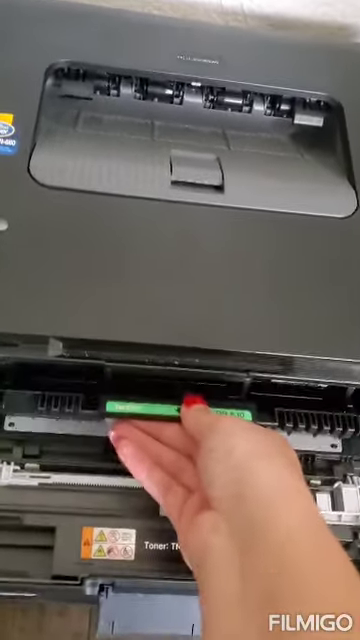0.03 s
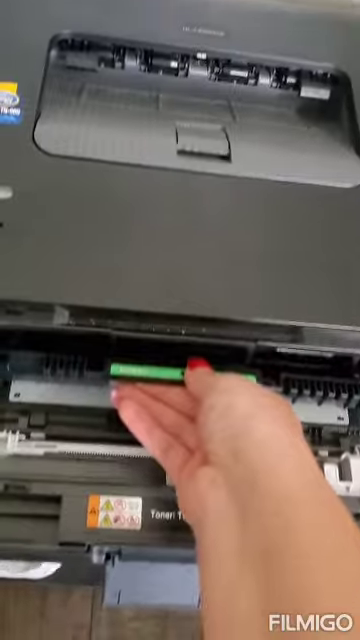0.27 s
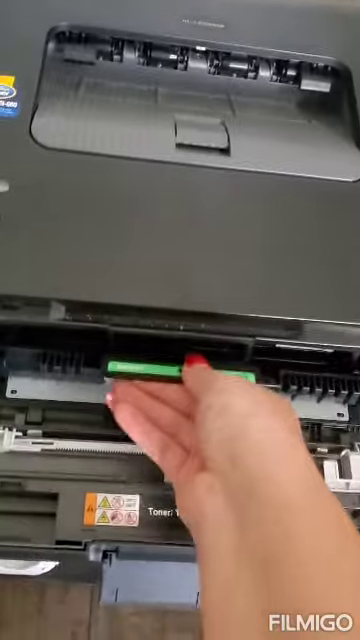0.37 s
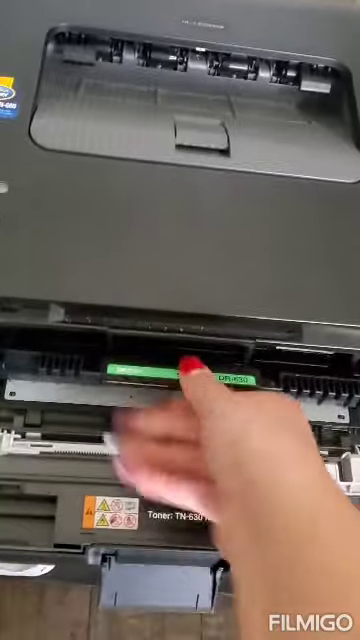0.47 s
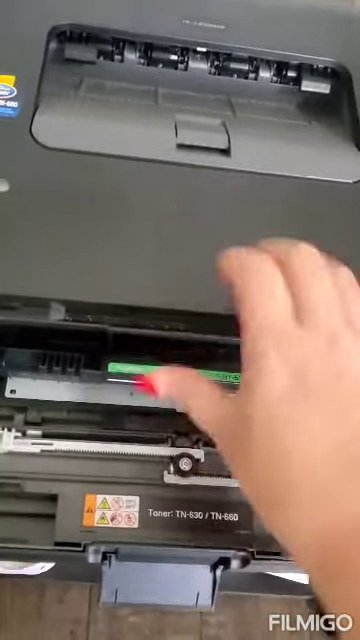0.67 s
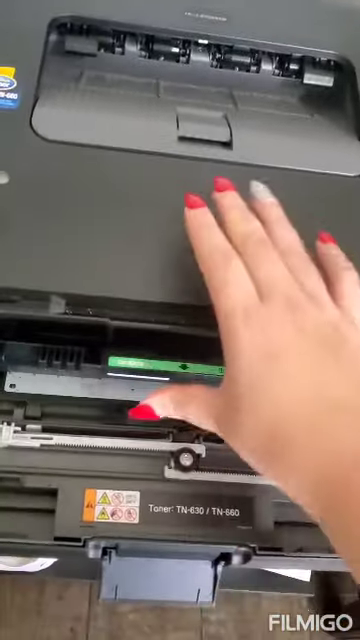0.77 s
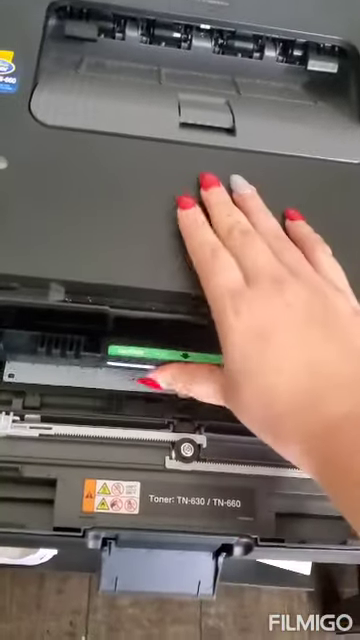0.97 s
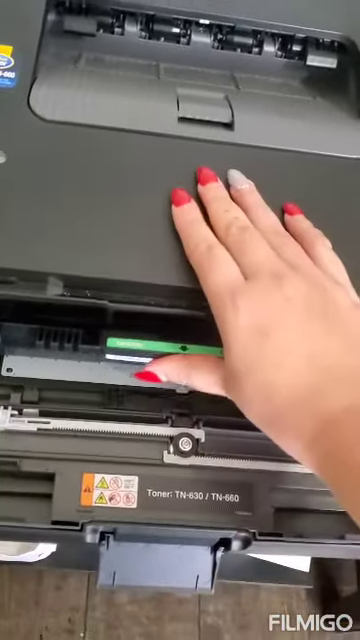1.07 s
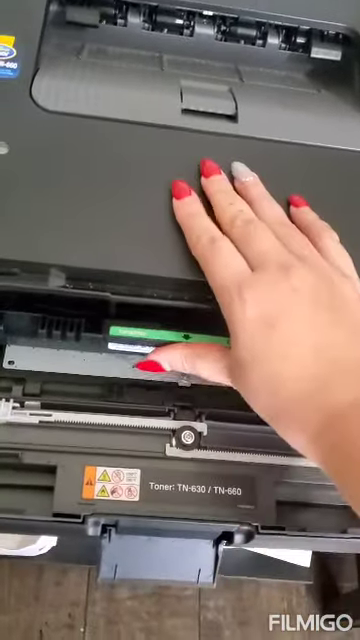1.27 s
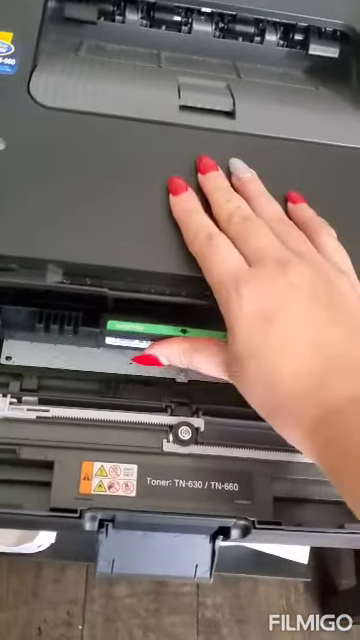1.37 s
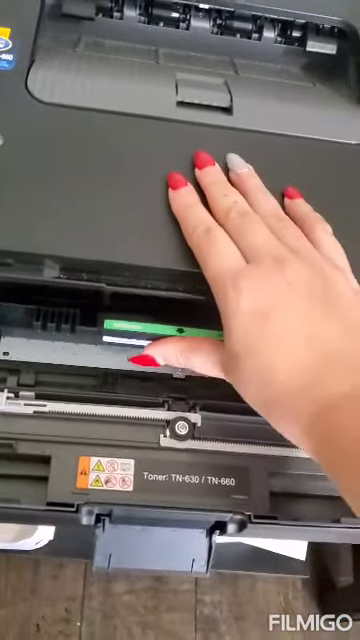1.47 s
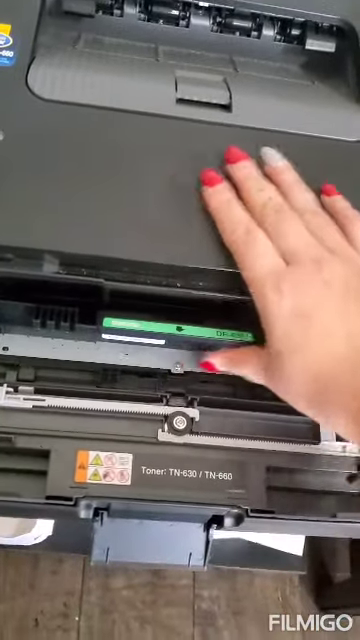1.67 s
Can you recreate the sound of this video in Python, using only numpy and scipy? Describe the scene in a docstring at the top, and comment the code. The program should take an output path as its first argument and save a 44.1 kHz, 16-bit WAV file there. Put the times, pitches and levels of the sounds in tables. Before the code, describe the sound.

Close up in a small, faintly humming room, a plastic cartridge scrapes into a printer and lands with a low clunk. After a brief lull come sharp clicks and snaps, with soft hand rubbing and a low rumble.

```python
"""A toner cartridge scrapes along its guides into an office printer and seats with a deep clunk.
The clunk is the printer's frame, shaken by a few heavy pushes. A hand rubs and presses on the
plastic parts, which click, snap and ring in the hollow housing, while the frame rumbles.
A small room answers each click, over a steady hiss and hum. The microphone is close."""
import sys
import numpy as np
from scipy import signal
from scipy.io import wavfile

SR = 44100
rng = np.random.default_rng(int(sys.argv[2]) if len(sys.argv) > 2 else 0)


def dump(signal):
    """Clip the signal to [-1, 1] and save it as 16-bit WAV at the path in sys.argv[1]."""
    limited = np.clip(np.atleast_2d(signal).T, -1, 1)
    pcm = np.round(limited * 32767).astype(np.int16)
    wavfile.write(sys.argv[1], SR, pcm)


N = 74970
T = np.arange(N) / SR


def from_db(db):
    """Turn decibels into a gain."""
    return 10 ** (np.asarray(db) / 20)


def rms_one(x):
    """Scale a sound to an average (rms) level of 1."""
    return x / np.sqrt(np.mean(x ** 2) + 1e-20)


def at_hz(points, hz):
    """Read between a table's rows, with octaves evenly spaced."""
    freqs, values = np.transpose(points)
    return np.interp(np.log(hz), np.log(freqs), values)


def pan(db):
    """Left and right gains that make the left louder by db."""
    return from_db(db * np.array([[.5], [-.5]]))


def drift(rate):
    """A smooth random wobble of size about 1; a higher rate [Hz] is quicker."""
    r = np.exp(-80 * np.pi * rate / SR)
    slow = signal.lfilter([1], [1, -2 * r, r * r], rng.standard_normal(N // 40 + 2002))[2000:]
    return np.interp(np.arange(N) / 40, np.arange(len(slow)), rms_one(slow))


def impulses(times, sizes):
    """One spike at each time."""
    return np.bincount(np.clip(times * SR, 0, N - 1).astype(int), sizes, N)


def ring(force, hz, t60):
    """Each spike starts a tone that dies away by 60 dB in t60 seconds."""
    r, w = from_db(-60 / (t60 * SR)), 2 * np.pi * hz / SR
    return signal.lfilter([0, np.sin(w)], [1, -2 * r * np.cos(w), r * r], force + 1e-18)


def resonate(x, hz, width):
    """Let through the sound near one pitch."""
    r, w = np.exp(-np.pi * width / SR), 2 * np.pi * hz / SR
    return signal.lfilter(np.array([1, 0, -1]) * (1 - r * r) / 2, [1, -2 * r * np.cos(w), r * r], x)


def rise_and_fade(power, rise_s, t60):
    """Each spike of power builds up, then falls by 60 dB in t60 seconds."""
    fading = signal.lfilter([1], [1, -from_db(-120 / (t60 * SR))], power + 1e-18)
    r = np.exp(-1 / (rise_s * SR))
    return signal.lfilter([1 - r], [1, -r], fading)


# How the microphone leans to one side: (frequency [Hz], left minus right [dB])
MIC_BALANCE = [(300, 1), (1300, 1.5), (2500, 4), (4200, 1.5), (5600, 9.5), (7000, 0), (8500, 1),
               (10500, -7), (14000, -2)]
def noise_bands(likeness):
    """Stereo noise in slices from low to high: each slice's pitch, filter and noise."""
    edges_hz = np.r_[22 * 2 ** (np.arange(24) / 3), np.arange(5300, 16600, 1120)]
    white = rng.standard_normal((2, 2, N))
    for k, (low, high) in enumerate(zip(edges_hz, edges_hz[1:])):
        hz = np.sqrt(low * high)
        band_filter = signal.butter(2, [low, high], "band", fs=SR, output="sos")
        mid, side = signal.sosfilt(band_filter, white[k % 2])
        alike = np.clip(at_hz(likeness, hz), -1, 1)
        noise = np.sqrt((1 + alike) / 2) * mid + np.sqrt((1 - alike) / 2) * side * [[1], [-1]]
        yield hz, band_filter, noise * pan(at_hz(MIC_BALANCE, hz))


# How alike left and right are in the hiss: (frequency [Hz], likeness [-1 to 1])
HISS_LIKENESS = [(60, 0.82), (200, 1), (350, -0.42), (650, -0.14), (1300, -0.66), (3000, -0.096),
                 (7000, 0.69), (13000, 1)]
def hiss_bands():
    """Slices of noise that the room's hiss and the rubbing hand share."""
    return [(hz, noise) for hz, _, noise in noise_bands(HISS_LIKENESS)]


# The tone of the room's hiss: (frequency [Hz], relative level [dB])
AIR_TONE = [(25, -14), (45, -11.5), (72, -3.5), (100, -5), (135, -10), (175, -13), (220, -13), (300, -8),
            (400, -14), (650, -19), (1000, -21.5), (1300, -21), (1800, -25), (2500, -29.5), (4000, -42.5),
            (5700, -53.5), (7500, -46), (9200, -59), (10500, -46.5), (12000, -45), (16000, -51)]
# Which side it comes from: (frequency [Hz], left minus right [dB])
AIR_BALANCE = [(100, 1), (400, -2.5), (1200, 2), (2500, 2), (4000, 3), (5500, 7), (7000, 10), (8500, -3),
               (10500, 12), (13000, 5)]
def room_air(hiss, level_db=-54.5):
    """Steady room noise, mostly from the left."""
    air = sum(noise * from_db(at_hz(AIR_TONE, hz)) * pan(at_hz(AIR_BALANCE, hz)) for hz, noise in hiss)
    return from_db(level_db) * rms_one(air)


# The tones of the hum: (pitch [Hz], level [dB])
HUM_TONES = [(69, -60.5), (304.5, -51), (1217, -68), (1389, -72)]
def hum(waver_hz=1.24, waver_db=0.95):
    """A few steady tones waver slightly in pitch and loudness."""
    out = 0
    for hz, db in HUM_TONES:
        phase = 2 * np.pi * np.cumsum(hz + waver_hz * drift(rate=5.9)) / SR
        out += np.sqrt(2) * from_db(db + waver_db * drift(rate=1.67)) * np.sin(phase)
    return out * pan(db=1.5)


# How loudly the hand rubs: (time [s], level [dB])
RUB_LEVELS = [(0, -66), (.045, -53.5), (.15, -63), (.22, -58.5), (.42, -56), (.5, -55), (.58, -65),
              (.78, -70.5), (.85, -63), (.95, -61), (1.1, -63.5), (1.19, -66.5), (1.3, -62.5), (1.5, -57),
              (1.62, -57.5), (1.7, -55)]
# The tone of the rubbing: (frequency [Hz], relative level [dB])
RUB_TONE = [(150, 1), (800, 7.5), (2000, 4), (4000, -7), (5700, 0.5), (8500, -24.5), (15000, -14.5)]
def hand_rub(hiss):
    """Skin sliding on plastic makes a grainy hiss."""
    rub = sum(noise * from_db(at_hz(RUB_TONE, hz)) for hz, noise in hiss)
    level_db = np.interp(T, *np.transpose(RUB_LEVELS)) + 0.5 * drift(rate=34)
    return from_db(level_db) * rms_one(rub)


# How loudly the frame rumbles: (time [s], level [dB])
RUMBLE_LEVELS = [(0, -74), (.11, -45), (.17, -56), (.225, -39), (.33, -53), (.39, -34.5), (.44, -44.5),
                 (.5, -58.5), (.65, -85), (.78, -53.5), (1.4, -54.5), (1.58, -58), (1.65, -50), (1.7, -41)]
def frame_rumble(pitch_hz=68.34, wander_hz=8.3):
    """The frame sways at a low, unsteady pitch as the hand leans on it."""
    phase = 2 * np.pi * np.cumsum(pitch_hz + wander_hz * drift(rate=23.2)) / SR
    level_db = np.interp(T, *np.transpose(RUMBLE_LEVELS))
    return np.sqrt(2) * from_db(level_db) * np.sin(phase)


# Brief swells of noise: (time [s], level [dB], about half the length [s], pitch [Hz])
NOISE_SWELLS = [(0.054, -59, .012, 5150), (0.057, -46, 0.0029, 3550), (0.19, -49, .01, 784),
                (0.229, -50, 0.016, 696), (0.241, -44, 0.0054, 1200), (0.253, -42, .007, 780),
                (0.432, -61.5, 0.0064, 11100), (0.5, -57, 0.011, 2696), (.471, -48, .0025, 5800),
                (0.899, -53.5, 0.0051, 1220), (0.957, -52, 0.0091, 856), (1.231, -41.5, 0.0051, 4740),
                (1.238, -38.5, 0.0037, 13300), (1.263, -58, 0.029, 13800), (1.68, -62, 0.029, 11080)]
def scrapes_and_sizzle():
    """Noise swells around one pitch: short scrapes, and the bright sizzle and tail of a sharp snap."""
    out = np.zeros((2, N))
    for time, db, half_length, hz in NOISE_SWELLS:
        width_hz = 0.26 * hz
        noise = rng.standard_normal((2, N))
        pitched = resonate(resonate(noise, hz, width_hz), hz, width_hz)
        swell = np.exp(-.5 * ((T - time) / half_length) ** 2)
        out += from_db(db) * swell * rms_one(pitched)
    return out


# The tone of the hollow plastic, and of the room's echo of it: (frequency [Hz], boost [dB])
PLASTIC_TONE = [(150, -5.5), (280, 1.5), (500, -1.5), (750, 0), (1300, 2), (2000, 1), (3000, 0.5),
                (4300, -4), (6000, -7.5), (9000, -14), (12000, -18.5), (16000, -24)]
ECHO_TONE = [(150, -5), (500, -8.5), (1500, -11), (3000, -13.5), (6000, -15.5), (14000, -10)]
# How long each lasts: (frequency [Hz], time to fade by 60 dB [s])
PLASTIC_FADE = [(200, 0.07), (1000, 0.067), (3000, 0.05), (14000, 0.045)]
ECHO_FADE = [(150, .45), (1000, 0.29), (3000, 0.3), (7000, 0.3), (14000, 0.18)]
# How alike left and right are in a click: (frequency [Hz], likeness [-1 to 1])
RATTLE_LIKENESS = [(150, 0.99), (300, 0.99), (600, -0.43), (1300, -0.44), (3000, -0.19), (7000, .15),
                   (13000, 0.59)]
# Plastic parts knocking together:
# (time [s], strength [dB], bass boost [dB], treble boost [dB], ring pitch [Hz], ring boost [dB])
CONTACTS = [(.058, -46, 7, 4, 3270, -3), (0.065, -31.5, 4, -1, 3380, -5), (.069, -36, 4.5, -1, 1150, 7),
            (0.074, -36, 13, -8, 1222, 3), (.082, -36.5, 3.5, -2, 1500, 0), (0.09, -32, 6, -3, 1937, -2),
            (0.098, -38, 0, -17, 2870, -4), (0.101, -47.5, 4, -8, 1640, 9.5),
            (.245, -35.5, 5.5, 11, 748, -2.5), (.248, -40, 16, -10, 1920, 7.5),
            (0.259, -35, 4, 4, 1520, -33), (.265, -33.5, -23, 0.5, 4000, -5.5),
            (0.274, -43, 13.5, 9, 1140, -15), (0.281, -38.5, -2, 4, 1950, -16),
            (.306, -41, 12.5, 0, 1590, -3), (0.437, -42.5, -6, 4.5, 1360, 1), (.471, -38, -1, 6, 2472, 0.5),
            (.475, -54, -1, -4, 3070, 9), (0.9718, -37, 2, 6.5, 1062, 2.5), (0.975, -45, -23, 7, 3240, 4),
            (1.069, -52, -5, -3, 2660, -11), (1.2268, -33.5, 1, 5, 3070, -6),
            (1.236, -27.5, -8.5, 5, 3270, -10), (1.242, -35.5, 3.5, -1, 1326, -10),
            (1.328, -42, -12, -12, 5460, -7), (1.333, -47.5, 13, 1, 1350, 2),
            (1.416, -29.5, -1, -3.5, 1996, -1), (1.419, -34.5, 2, -19, 1482, 9.5),
            (1.445, -40.5, 10, -28, 490, 3), (1.459, -44, 10, -26, 986, 7),
            (1.468, -51.5, 16, -14, 574, -8), (1.526, -45, 6, 0, 1193, 3), (1.544, -36, 3, 1, 2094, 0),
            (1.549, -39, -4, -38, 1294, 7), (1.604, -46, 1, 0, 5700, -8), (1.609, -43.5, -3, 0, 1300, -2),
            (1.692, -32, -38, -2.5, 2620, -1.5), (1.697, -38, -36, 4, 3150, -4)]
def clicks(bass_hz=616, middle_hz=2930, treble_hz=11800):
    """Each contact gives a sharp crack, a fast rattle spreading through the plastic and a room echo."""
    times, db, bass_db, treble_db, _, _ = np.transpose(CONTACTS)
    out = np.zeros((2, N))
    for k, (hz, band_filter, noise) in enumerate(noise_bands(RATTLE_LIKENESS)):
        if hz < 130:   # clicks have no deep bass
            continue
        bass = at_hz([(bass_hz, 1), (middle_hz, 0)], hz)
        treble = at_hz([(middle_hz, 0), (treble_hz, 1)], hz)
        band_db = db + bass * bass_db + treble * treble_db + at_hz(PLASTIC_TONE, hz)
        sizes = from_db(band_db) * np.sqrt(SR / 2 / middle_hz)
        power = impulses(times, sizes ** 2)
        rattle = rise_and_fade(power, rise_s=0.00044, t60=at_hz(PLASTIC_FADE, hz))
        echo = rise_and_fade(power, rise_s=0.004, t60=at_hz(ECHO_FADE, hz))
        out += noise * np.sqrt(rattle * from_db(-1) ** 2 + echo * from_db(at_hz(ECHO_TONE, hz)) ** 2)
        crack = signal.sosfilt(band_filter, impulses(times, sizes) + 1e-18)
        crack *= np.sqrt(SR / 1000) * (-1) ** k   # every other slice is flipped
        out += from_db(-14.5) * crack * pan(at_hz(MIC_BALANCE, hz))
    return out


def ringing_parts():
    """Each knocked part rings briefly at its own pitch, reaching the right side a little late."""
    out = np.zeros((2, N))
    lag_cycles = rng.uniform(0.18, 0.25, len(CONTACTS))
    for (time, db, _, _, hz, ring_db), cycles in zip(CONTACTS, lag_cycles):
        for channel, lag in enumerate((0, cycles / hz)):
            knock = impulses(np.array([time + lag]), [from_db(db + ring_db)])
            out[channel] += ring(knock, hz, t60=0.049)
    return out


# Where the open housing rings: (pitch [Hz], width [Hz], left gain [dB], right gain [dB])
HOUSING_TONES = [(762, 42, -1, -20), (1244, 13, -26, -4), (1229, 73, -10, -0.5), (1540, 17, -21, -9),
                 (1720, 24, -35.5, 6), (2050, 30, -23, 5), (2420, 120, -3, -1), (2946, 48, 7, -4),
                 (3330, 94, -15.5, -1), (3670, 98, -21, 5), (5540, 430, -7, -25), (6130, 100, -21, -36),
                 (10900, 400, -38, -13.5), (15500, 550, -2, -18)]
def housing(x):
    """The hollow housing colours every click with the same set of pitches."""
    return x + sum(from_db([[left], [right]]) * resonate(x, hz, width)
                   for hz, width, left, right in HOUSING_TONES)


# Bounces off the printer and a nearby wall: (left delay [s], right delay [s], gain [dB])
BOUNCES = [(.0019, 0.0035, -10.5), (.0053, 0.0049, -12.5), (0.025, .028, -14.5)]
def bounces(x):
    """Near surfaces send back quieter copies, with their own delay on each side."""
    return x + sum(from_db(db) * np.array([np.interp(T - left, T, x[0]), np.interp(T - right, T, x[1])])
                   for left, right, db in BOUNCES)


# Pushes on the frame: (time [s], strength [dB], length [s], direction [+1 or -1])
FRAME_PUSHES = [(0.2417, -21, 0.0014, -1), (0.2451, -19, 0.0018, 1), (.2555, -11.5, 0.0048, -1),
                (0.2593, -22, 0.0031, 1), (0.286, -36, 0.0034, -1), (0.084, -40, 0.00078, 1),
                (1.236, -47.5, 0.0011, 1), (1.445, -37.5, .002, -1), (1.464, -42, 0.0025, 1)]
# The frame's own low notes: (pitch [Hz], gain [dB], time to fade by 60 dB [s])
FRAME_TONES = [(42.5, -9, 0.28), (58.3, -4.5, 0.12), (67.1, -7.5, 0.17), (97.5, -7, 0.19),
               (131.3, -7, 0.17), (151.4, -9, 0.12), (266, 0, 0.092), (315.8, -1.5, 0.26),
               (410.6, -11.5, 0.14)]
def clunk(low_cut_hz=46, left_delay_s=0.00046):
    """Soft, heavy pushes set the frame ringing; the thud reaches the left side a little late."""
    force = np.zeros(N)
    for time, db, length, direction in FRAME_PUSHES:
        pulse = np.sin(np.pi * np.clip((T - time) / length + .5, 0, 1))
        force += direction * from_db(db) * pulse / pulse.sum()
    force = signal.sosfilt(signal.butter(2, low_cut_hz, "high", fs=SR, output="sos"), force)
    thud = sum(from_db(db) * ring(force, hz, t60) for hz, db, t60 in FRAME_TONES)
    return np.array([np.interp(T - left_delay_s, T, thud), thud])


def scene():
    """Cartridge, printer, hand and room together."""
    plastic = from_db(-2) * bounces(housing(clicks())) + ringing_parts() + scrapes_and_sizzle()
    frame = frame_rumble() + clunk()
    hiss = hiss_bands()
    return plastic + frame + hand_rub(hiss) + room_air(hiss) + hum()


def record(dry):
    """The very highest treble is cut off steeply."""
    cutoff_hz = 15900
    return signal.sosfilt(signal.ellip(10, .1, 80, cutoff_hz, fs=SR, output="sos"), dry)


dry = scene()
out = record(dry)
dump(out)
```